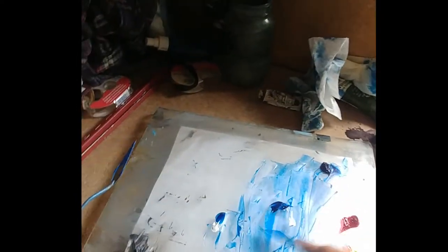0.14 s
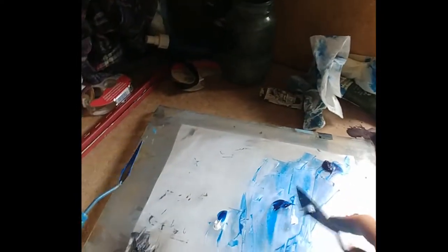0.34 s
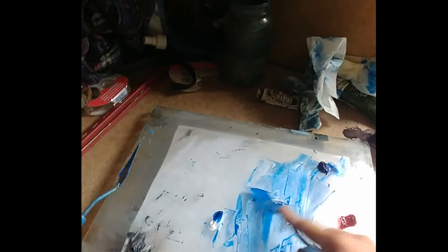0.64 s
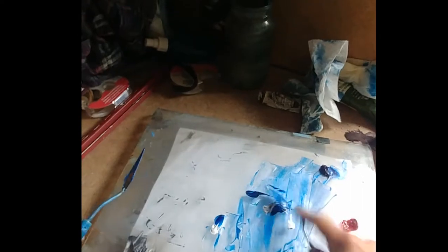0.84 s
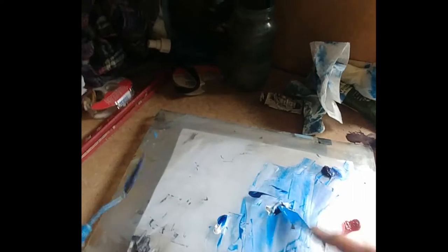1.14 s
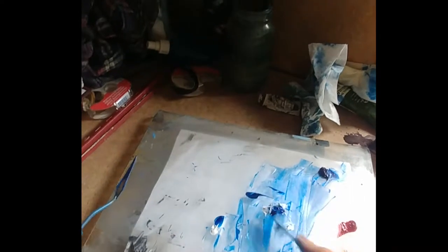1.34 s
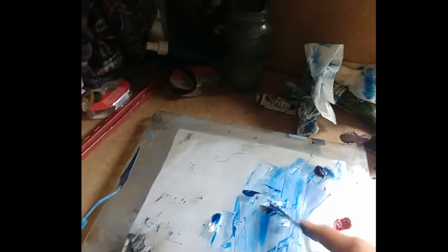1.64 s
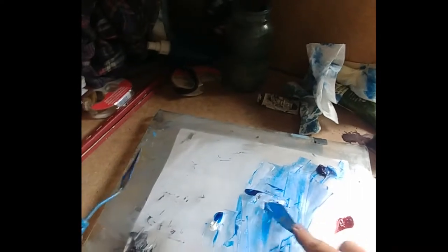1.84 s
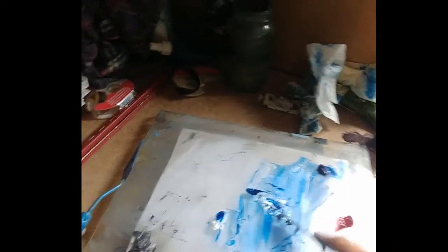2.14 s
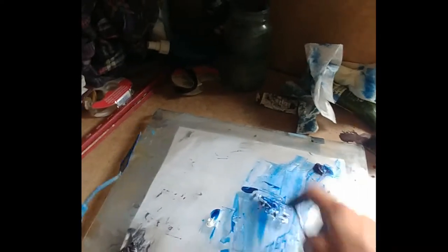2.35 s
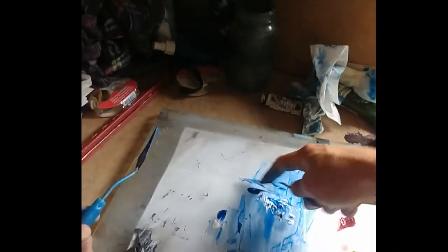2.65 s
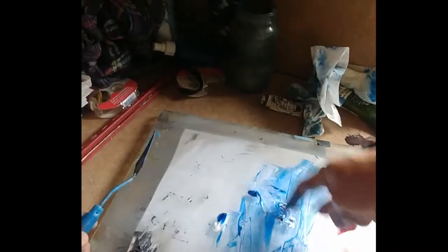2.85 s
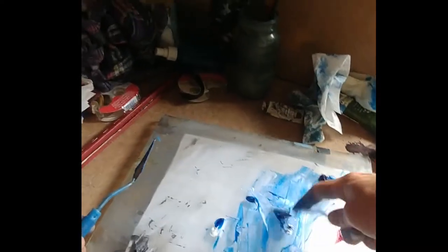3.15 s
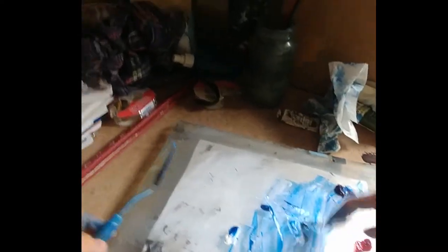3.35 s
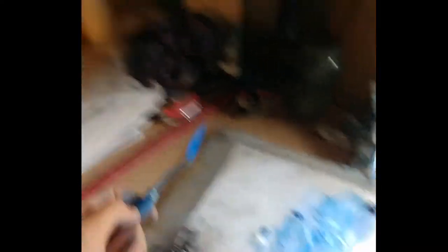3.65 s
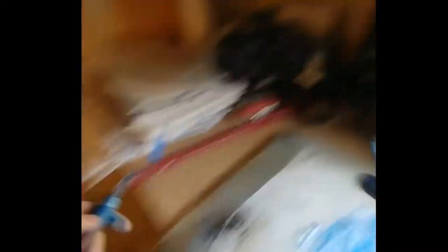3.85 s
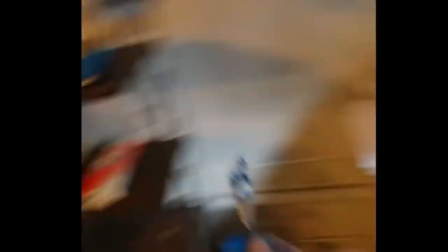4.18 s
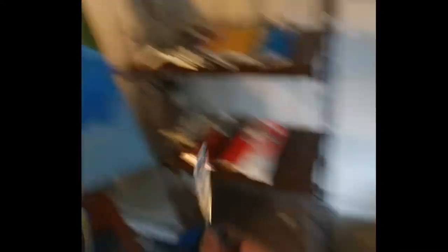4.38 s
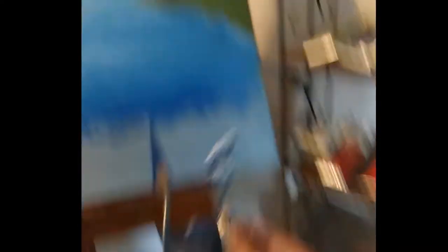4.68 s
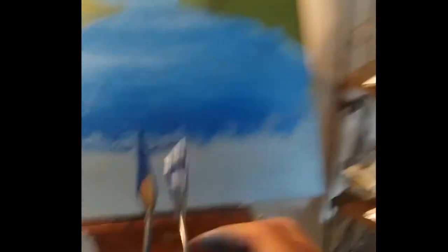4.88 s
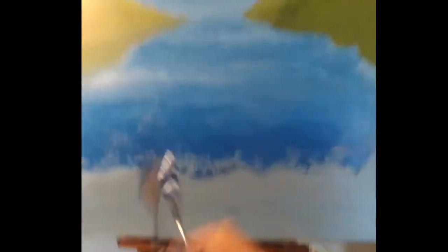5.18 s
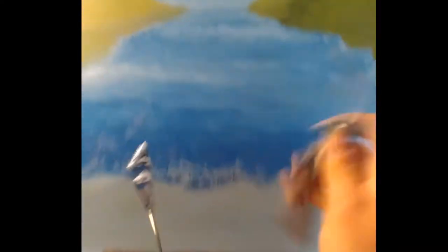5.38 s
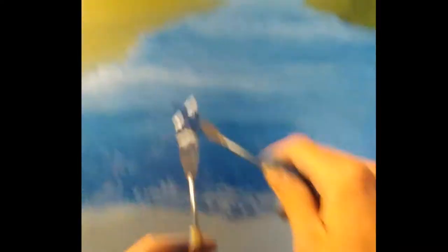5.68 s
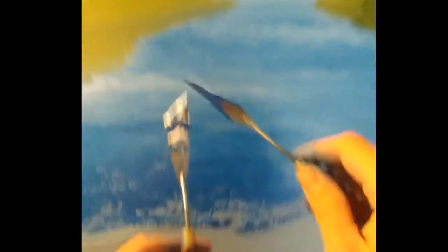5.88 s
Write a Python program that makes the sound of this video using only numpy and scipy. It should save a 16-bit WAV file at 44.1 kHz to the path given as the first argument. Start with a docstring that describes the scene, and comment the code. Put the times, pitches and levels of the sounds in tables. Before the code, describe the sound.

Scattered woody clacks with short metallic ring and faint wet paint sizzle, mixed with short scrapes and a brief squeak. After a strong double knock come duller finger thuds and groaning rubs on the board. Low lumpy handling noise and a cluster of bass thumps follow, with sleeve rustle, then quiet brushing on canvas. Dry little room, handheld stereo microphone, brighter to the left, faint hiss.

```python
"""A palette knife knocks and scrapes paint on a board lying on a wooden table; then a finger dabs and rubs it.
Blows are short noise plus ringing modes; strokes are coloured noise that swells and fades, over a stick-slip drone.
A hand-held recorder is swung round, bumping and rumbling, and the knife starts to spread paint on stretched canvas.
Around it lies a small, quiet room, heard through two microphone ports that face different ways."""
import sys
import numpy as np
from scipy import signal
from scipy.fft import rfft, irfft, next_fast_len
from scipy.io import wavfile

SR = 44100
rng = np.random.default_rng(int(sys.argv[2]) if len(sys.argv) > 2 else 0)


def materialize(psi):
    """Save the field psi as 16-bit PCM at rate SR to the path in sys.argv[1].

    A 1-D psi becomes a single channel; in a 2-D psi each row is a channel.
    """
    bounded = np.clip(np.atleast_2d(psi).T, -1, 1)
    quanta = np.round(bounded * 32767).astype(np.int16)
    wavfile.write(sys.argv[1], SR, quanta)


N = 265482
BLOW = SR // 3   # samples given to one blow
ONSET = SR // 30   # samples over which a blow's level is set
ROOM_T60_S = 0.3


def from_db(db):
    """Decibels to gain."""
    return 10 ** (np.asarray(db) / 20)


def rms_one(x, size=None):
    """Scale so that the first size samples have rms 1."""
    return x / np.sqrt(np.mean(x[..., :size] ** 2) + 1e-20)


def on_bins(points, size):
    """Read a table over frequency at the bins of a transform."""
    hz, value = np.transpose(points)
    return np.interp(np.log(np.fft.rfftfreq(size, 1 / SR) + 1), np.log(hz), value)


def noise(colour, size, low=20, high=SR / 2):
    """Two unrelated noises with the given spectrum and band, together at rms 1."""
    padded = next_fast_len(size, True)
    hz = np.fft.rfftfreq(padded, 1 / SR) + 1
    band = 1 / np.sqrt((1 + (low / hz) ** 12) * (1 + (hz / high) ** 12))
    spectrum = rfft(rng.standard_normal((2, padded))) * band * from_db(on_bins(colour, padded))
    return rms_one(irfft(spectrum, padded)[:, :size])


def with_bands(colour, bands):
    """Lay bell-shaped humps and hollows over a spectrum."""
    hz = np.geomspace(30, SR / 2, 600)
    points_hz, points_db = np.transpose(colour)
    bells = sum(db * np.exp(-((hz - centre) / width) ** 2) for centre, width, db in bands)
    return np.column_stack([hz, np.interp(np.log(hz), np.log(points_hz), points_db) + bells])


def flutter(rate, depth_db):
    """A gain that wanders at random, with a new target rate times a second."""
    targets = rng.standard_normal(N // 8)
    wander = np.interp(np.arange(N) * rate / SR, np.arange(len(targets)), targets)
    return rms_one(from_db(depth_db * wander))


def strokes(rows):
    """One gain per level column: every stroke swells and fades, and overlapping strokes add in power."""
    t, power = np.arange(N) / SR, 0
    for s, swell_s, fade_s, *levels_db in rows:
        # 0 at the peak, 1 where the stroke is 20 dB down; the exponent shapes it: 1 = pointed, 2 = bell
        away = np.clip(np.maximum((s - t) / swell_s, (t - s) / fade_s), 0, 10)
        power = power + np.outer(from_db(levels_db), from_db(-20 * away ** 1.43)) ** 2
    return np.sqrt(power)


def favour(modes, near_hz, width_hz, lift_db):
    """The place of a blow brings out the modes near one pitch."""
    return [(hz, db + lift_db * np.exp(-((hz - near_hz) / width_hz) ** 2), t60) for hz, db, t60 in modes]


def dying(t60):
    """A gain over one blow that falls by 60 dB in t60 seconds."""
    return from_db(-60 * np.arange(BLOW) / SR / t60)


def ring(modes):
    """Struck modes of varying strength and random phase, with a soft attack; a pair in quadrature."""
    t = np.arange(BLOW) / SR
    hz, db, t60 = np.transpose(modes)[:, :, None]
    strength = from_db(db + 2 * rng.standard_normal(hz.shape) - 60 * t / t60)
    turns = hz * t + rng.random(hz.shape)
    wave = np.sum(strength * np.exp(2j * np.pi * turns), axis=0)
    wave = wave * (1 - np.exp(-t / .0007))
    return rms_one(np.array([wave.real, wave.imag]), size=ONSET)


def blow(zones, levels_db, colour, modes, crack_db):
    """One contact: per zone a first crack, a few clear modes and a noisy crowd of others with a room tail."""
    t, out = np.arange(BLOW) / SR, 0
    impulse = (t == 0) + 1e-18
    for (low, high, gain_db, rise, t60, tail_db, share), level_db in zip(zones, levels_db):
        decay = np.hypot(from_db(-60 * t / t60), from_db(tail_db - 60 * t / ROOM_T60_S))
        wave = rms_one(noise(colour, BLOW, low, high) * decay, size=ONSET)
        inside = [mode for mode in modes if low < mode[0] < high]
        if inside:
            wave = np.sqrt(1 - share) * wave + np.sqrt(share) * ring(inside)
        body = rms_one(wave * (1 - np.exp(-t / rise)), size=ONSET)
        crack_band = signal.butter(3, [low, np.sqrt(low * high)], "band", fs=SR, output="sos")
        crack = rms_one(signal.sosfilt(crack_band, impulse), size=ONSET)
        crack_pair = crack * [[1], [0]]   # only in the first of the two signals
        out = out + from_db(level_db + gain_db) * (body + from_db(crack_db) * crack_pair)
    return out


def cushioned(wave, zone_db, contact_s):
    """Skin gives way: the lighter the touch, the slower its attack."""
    rise = contact_s * from_db(-max(zone_db) - 26.5)   # contact_s holds when the loudest zone is at -26.5 dB
    return wave * (1 - np.exp(-np.arange(BLOW) / SR / rise))


def add(track, s, wave):
    """Mix a wave into the track at a time in seconds."""
    start = max(round(s * SR), 0)
    track[:, start:start + wave.shape[1]] += wave[:, :N - start]


# quiet room's spectrum: (frequency [Hz], relative density [dB])
ROOM_SPECTRUM = [(18, -28.5), (30, -13.5), (70, -1.5), (666, -9), (3060, -18.5), (3490, -16.5),
                 (3870, -17.5), (4530, -18), (8740, -27), (12600, -31.5), (16000, -19.5)]


def room_tone():
    """The quiet room is a steady coloured noise."""
    return from_db(-68) * noise(ROOM_SPECTRUM, N)


# knife on the board, levels before zone gain and blade lift: (time [s], thud [dB], board [dB], clack [dB],
# tick [dB], favoured board pitch [Hz], favoured blade pitch [Hz], blade ring [dB])
KNIFE_HITS = [(0.011, -62, -49, -54, -53.5, 468, 2850, -60.5),
              (0.5985, -38.5, -38, -29.5, -35.5, 420, 1798, -34),
              (0.708, -57.5, -51.5, -71, -78, 514, 2060, -63),
              (1.142, -48, -39.5, -51.5, -68, 710, 2690, -63),
              (1.2836, -35, -30, -25, -32.5, 505, 2080, -38.5), (1.475, -50, -48, -68, -86, 530, 2700, -80),
              (1.608, -51, -42, -61, -65, 499, 2380, -77),
              (1.684, -40, -36.5, -29.5, -51.5, 466, 2530, -39.5),
              (1.863, -53, -40, -59, -74, 517, 1960, -70), (1.923, -51, -53, -64.5, -76.5, 514, 2690, -73),
              (2.141, -49, -57, -47.5, -65.5, 495, 2940, -61.5),
              (2.1867, -31.5, -25.5, -30, -47, 473, 2595, -47),
              (2.1973, -28.5, -16.5, -18, -32.5, 393, 2440, -32)]
# zones of a knife blow: (low [Hz], high [Hz], gain [dB], rise time constant [s], noise t60 [s],
# room tail [dB], power share of clear modes [0-1])
KNIFE_ZONES = [(49.7, 620, -1, 0.007, 0.3, -17, .6), (328, 680, -2.5, 0.00057, 0.16, -13.5, 0.85),
               (680, 5000, -3, 0.0027, 0.085, -8, 0.18), (3570, 9350, -5.5, 0.0011, .1, -0.5, 0)]
# board on the table: (frequency [Hz], mean strength [dB], t60 [s])
TABLED_BOARD = [(78.7, -9.5, 0.39), (138, -1, 0.2), (161.4, 5.5, 0.15), (247.7, -1, 0.27), (394, -5.5, 0.1),
                (468, -5.5, 0.12), (514, -2.5, 0.11), (710, 2, 0.11), (803, -3.5, 0.085), (892, -10, 0.11),
                (1062, -8.5, 0.27), (1163, -5.5, 0.1), (1375, -3.5, .22), (1515, -7.5, 0.28)]
# steel blade before the hand and paint damp it: (frequency [Hz], mean strength [dB], t60 [s])
STEEL_BLADE = [(1770, -5, 0.061), (2060, -4.5, .15), (2102, 0, 0.14), (2600, -5.5, 0.035),
               (2500, -30, 0.099), (2690, -10.5, 0.46), (2850, 6.5, 0.039), (3200, -4.5, 0.071),
               (3186, -5.5, 0.15), (4600, -19.5, 0.15), (5000, -14, .12), (7060, -27.5, 0.31)]
# knife's clack: (frequency [Hz], relative density [dB]), then its humps: (centre [Hz], width [Hz], height [dB])
CLACK_SPECTRUM = [(50, -21), (100, -2.5), (160, -2.5), (320, -3), (480, 0.5), (610, -3.5), (850, 3.5),
                  (1300, -1), (3100, -3), (3800, -14), (5000, -17.5), (5900, -20), (7400, -14.5),
                  (9000, -23), (10500, -49), (14000, -32.5)]
CLACK_HUMPS = [(576, 45, -7.5), (900, 69, -0.5), (2108, 120, 1), (2440, 210, -2.5), (3070, 110, 4),
               (3880, 170, -3.5), (4920, 230, 5.5), (5800, 330, -2.5), (7250, 300, 2)]
# wet paint, spitting or sizzling: (frequency [Hz], relative density [dB])
PAINT_SPECTRUM = [(5000, -13), (8000, -5), (10500, -6.5), (12000, -8), (13200, -1), (14500, -5),
                  (16000, -3.5)]


def knife_knocks():
    """The knife clacks on the board, its hand- and paint-damped blade rings and wet paint spits at every blow."""
    out, clack_colour = np.zeros((2, N)), with_bands(CLACK_SPECTRUM, CLACK_HUMPS)
    blade_lift_db, blade_damping_t60_s = 4, 0.46
    spit_below_tick_db, spit_t60_s = -23, 0.2
    for s, *zone_db, board_hz, blade_hz, blade_db in KNIFE_HITS:
        board = favour(TABLED_BOARD, board_hz, width_hz=30, lift_db=7)
        blade = favour(STEEL_BLADE, blade_hz, width_hz=90, lift_db=11)
        add(out, s, blow(KNIFE_ZONES, zone_db, clack_colour, board, crack_db=-19))
        add(out, s, from_db(blade_db + blade_lift_db) * ring(blade) * dying(blade_damping_t60_s))
        spit = noise(PAINT_SPECTRUM, BLOW) * dying(spit_t60_s)
        add(out, s, from_db(zone_db[-1] + spit_below_tick_db) * spit)
    return out


# board under a resting finger: (frequency [Hz], mean strength [dB], t60 [s])
FINGERED_BOARD = [(74, -5, 0.18), (98, -3, 0.26), (142, -2.5, 0.21), (254.2, -7.5, 0.39), (394, -6, 0.14),
                  (477.5, -3.5, 0.1), (511.7, 0, 0.1), (678, -6.5, .12), (836, -5.5, 0.058),
                  (1134, -11.5, 0.16), (1360, -7, 0.28)]


def stick_slip(per_s, spread_db):
    """Uneven small slips, softened by the paint, keep the board ringing while the contact damps it."""
    sizes = from_db(spread_db * rng.standard_normal(N)) * rng.choice([-1, 1], N)
    slips = sizes * (rng.random(N) < per_s / SR)
    soft = signal.sosfilt(signal.butter(2, 750, fs=SR, output="sos"), slips + 1e-18)
    board = ring(favour(FINGERED_BOARD, 520, width_hz=140, lift_db=9)) * dying(0.25)
    return rms_one(signal.fftconvolve(soft[None], board)[:, :N])


# soft swish and rough scratch, on board and cloth alike: (frequency [Hz], relative density [dB])
SWISH_SPECTRUM = [(600, -10.5), (1200, -8.5), (1700, -10.5), (2150, -0.5), (2450, -6.5), (2850, -1),
                  (3600, -15), (5000, -28), (9000, -41.5)]
SCRATCH_SPECTRUM = [(1000, -12), (3000, 4), (4700, 3.5), (5800, 0.5), (7500, 3.5), (9000, -9),
                    (11000, -21.5), (13500, -14.5), (16000, -15.5)]


def grainy(swish, scratch, sizzle=0):
    """Sliding contact catches on the grain: swish, scratch and sizzle flicker, the scratch most of all."""
    rough = from_db(2) * scratch * flutter(rate=61, depth_db=1.5)
    return flutter(rate=510, depth_db=1) * (from_db(-2) * swish + rough + from_db(4) * sizzle)


# knife or finger sliding on the board, levels before the mix trims: (fastest moment [s], 20 dB swell [s],
# 20 dB fade [s], drone [dB], swish [dB], scratch [dB], sizzle [dB])
BOARD_SLIDES = [(0.015, 0.12, 0.046, -48.5, -50, -63, -83), (0.15, 0.077, 0.051, -63, -70, -64.5, -88),
                (0.776, 0.035, 0.055, -60, -59.5, -68, -88), (0.89, 0.16, 0.12, -53.5, -59, -70.5, -87),
                (1.352, 0.045, 0.07, -68, -54, -44, -47), (1.654, 0.031, 0.074, -60, -55.5, -55.5, -67),
                (1.81, .1, .07, -68.5, -60, -87, -90), (1.98, 0.14, 0.058, -57.5, -66.5, -79, -88),
                (2.57, 0.12, 0.24, -74, -55.5, -86, -83), (2.776, .22, 0.22, -48, -48, -70, -93),
                (2.965, .15, 0.074, -45.5, -48.5, -48, -60), (3.135, 0.013, 0.14, -41.5, -48.5, -55, -50.5),
                (3.27, .11, 0.1, -40.5, -50, -54, -77), (3.475, 0.074, .06, -40.5, -50.5, -48, -55),
                (3.66, 0.11, 0.15, -72, -54, -66.5, -90)]


def board_rubbing():
    """The sliding board contact drones by stick-slip, swishes and scratches, and the wet paint sizzles."""
    drone_gain, swish_gain, scratch_gain, sizzle_gain = strokes(BOARD_SLIDES)
    drone = from_db(0.5) * drone_gain * stick_slip(per_s=160, spread_db=4)
    swish = swish_gain * noise(SWISH_SPECTRUM, N)
    scratch = scratch_gain * noise(SCRATCH_SPECTRUM, N)
    sizzle = sizzle_gain * noise(PAINT_SPECTRUM, N)
    return drone + grainy(swish, scratch, sizzle)


# hand shifting on the case, before a 1 dB cut: (firmest moment [s], 20 dB swell [s], 20 dB fade [s], rumble [dB])
GRIP_MOVES = [(0.13, .2, 0.115, -58), (0.61, 0.023, .2, -49), (0.84, 0.12, 0.21, -45),
              (1.5, .06, .05, -60.5), (1.69, 0.099, 0.18, -50), (1.98, 0.37, 0.095, -49.5),
              (2.33, 0.24, .12, -54), (2.6, 0.066, 0.17, -51.5), (3.03, 0.22, 0.1, -46.5),
              (3.2, .1, 0.13, -41.5), (3.42, 0.13, 0.19, -46.5), (3.72, .12, .07, -55.5),
              (3.88, 0.047, 0.12, -41.5), (4.24, .15, 0.31, -48.5), (4.44, .12, 0.13, -46.5),
              (4.69, 0.1, 0.062, -45.5), (4.92, 0.14, .15, -50.5), (5.04, .1, 0.16, -50.5),
              (5.23, 0.09, 0.24, -58), (5.56, 0.175, .22, -53), (5.93, .3, .2, -58)]
# rumble and bumps of the case: (frequency [Hz], relative density [dB])
CASE_SPECTRUM = [(35, -19), (63, 7.5), (95, -5.5), (145, -3.5), (300, -17), (700, -17), (1400, -26),
                 (3000, -19), (8000, -28), (15000, -80)]


def grip_rumble():
    """Fingers shifting on the case make a lumpy low noise."""
    rumble = noise(CASE_SPECTRUM, N, low=45, high=500) * flutter(rate=25, depth_db=3.5)
    return from_db(-1) * strokes(GRIP_MOVES) * rumble


# blade squeaking over the board: (fastest moment [s], 20 dB swell [s], 20 dB fade [s], level [dB])
BLADE_SQUEAKS = [(0.925, 0.087, 0.14, -60.5)]
# squeak before its band limits: (frequency [Hz], relative density [dB])
SQUEAK_SPECTRUM = [(1900, -29), (2080, -9), (2125, -2.5), (2170, -12), (2400, -30)]


def blade_squeak():
    """The blade's squeak is a narrow band of noise that swells and fades."""
    return strokes(BLADE_SQUEAKS) * noise(SQUEAK_SPECTRUM, N, low=1400, high=1640)


# finger on the board, levels before zone gain: (time [s], thud [dB], board [dB], clack [dB], tick [dB],
# favoured board pitch [Hz])
FINGER_HITS = [(2.578, -44, -28.5, -41.5, -59.5, 516), (2.771, -51.5, -39.5, -59.5, -61.5, 487),
               (2.874, -48.5, -36.5, -50, -58.5, 542), (2.982, -39, -34, -58, -62.5, 499),
               (3.118, -33, -20.5, -28, -31, 490), (3.37, -36, -23, -31.5, -39, 473.5)]
# zones of a dab: (low [Hz], high [Hz], gain [dB], rise time constant [s], noise t60 [s],
# room tail [dB], power share of clear modes [0-1])
FINGER_ZONES = [(50, 730, 0.0024, 0.0056, 0.32, -8, 0.73), (328.3, 680, 0.0059, 0.0024, 0.035, -19.5, 0.81),
                (653.5, 6000, 0, 0.00064, 0.11, -6, 0.025), (3540, 9900, 0.0075, 0.0022, 0.082, -2.5, 0)]
# finger's contact noise: (frequency [Hz], relative density [dB])
FINGER_SPECTRUM = [(50, -7.5), (100, -9.5), (160, 3.5), (290, -9.5), (480, -1.5), (680, -17), (850, -2),
                   (1150, 2), (1700, -7), (2700, 1), (3900, -15.5), (6600, -17), (9000, -26.5),
                   (14000, -36.5)]


def finger_dabs():
    """A finger strikes the board it damps, its skin rounding off the attack."""
    out = np.zeros((2, N))
    for s, *zone_db, board_hz in FINGER_HITS:
        board = favour(FINGERED_BOARD, board_hz, width_hz=28, lift_db=7.5)
        dab = blow(FINGER_ZONES, zone_db, FINGER_SPECTRUM, board, crack_db=-24)
        add(out, s, cushioned(dab, zone_db, contact_s=.0006))
    return out


# bumps on the case, levels before zone gain: (time [s], thump [dB], knock [dB], click [dB])
CASE_HITS = [(3.861, -39.5, -55, -70), (4.065, -44.5, -58, -66), (4.461, -30.5, -49, -62),
             (4.505, -24.5, -29.5, -42.1), (4.554, -26, -39, -58), (4.568, -25, -43, -50.5),
             (4.612, -37, -73.5, -62.5), (4.657, -36.5, -52.5, -61.5), (4.914, -49, -63.5, -65.5),
             (4.998, -46, -63, -65), (5.034, -48.5, -71, -71.5), (5.546, -53.5, -67, -77)]
# zones of a bump: (low [Hz], high [Hz], gain [dB], rise time constant [s], noise t60 [s],
# room tail [dB], power share of clear modes [0-1])
CASE_ZONES = [(42.8, 390, -1.1, 0.0017, 0.098, -5.5, 0.8), (330, 1820, -0.99, 0.00029, 0.11, -16.5, 0),
              (2020, 9000, -1.5, 0.00059, 0.039, -13, 0)]
# recorder's case in the hand: (frequency [Hz], mean strength [dB], t60 [s])
HELD_CASE = [(61.3, -3, 0.3), (138.6, 2, .16), (223.2, -4, 0.12)]


def case_bumps():
    """Fingers bump the case: low modes and short noise, cushioned by skin."""
    out = np.zeros((2, N))
    for s, *zone_db in CASE_HITS:
        bump = blow(CASE_ZONES, zone_db, CASE_SPECTRUM, HELD_CASE, crack_db=-5.5)
        add(out, s, cushioned(bump, zone_db, contact_s=.00008))
    return out


# hand and sleeve moving, then knife on canvas, levels before the mix trims: (fastest moment [s],
# 20 dB swell [s], 20 dB fade [s], swish [dB], scratch [dB], hollow [dB])
CLOTH_SLIDES = [(3.92, 0.12, 0.17, -47.5, -57.5, -59), (4.1, 0.23, 0.19, -59.5, -78, -69),
                (4.335, 0.077, .09, -50.5, -57.5, -55.5), (4.475, .09, 0.075, -45, -57, -57),
                (4.57, 0.011, 0.041, -63, -51.5, -60), (4.71, 0.056, 0.18, -57.5, -69.5, -67),
                (4.895, .02, 0.041, -65, -68.5, -73), (5.042, 0.045, 0.091, -74, -77.5, -58.5),
                (5.22, 0.072, .25, -67, -86, -89), (5.45, 0.11, .08, -63, -75.5, -66.5),
                (5.536, 0.04, .03, -63, -83.5, -58.5), (5.64, .05, .25, -65.5, -69, -67.5),
                (5.86, 0.084, 0.11, -51.5, -60.5, -56), (5.97, 0.22, 0.18, -53, -55, -79)]
# humps and hollows of the rubbing cloth: (centre [Hz], width [Hz], height [dB])
CLOTH_HUMPS = [(1610, 110, 6.5), (2320, 85, -1.5), (4200, 490, 3), (5570, 440, -1.5), (7600, 200, 2.5)]
# hollow sound of the cloth: (frequency [Hz], relative density [dB])
HOLLOW_SPECTRUM = [(150, -10), (300, 0.5), (430, 0), (570, 4.5), (850, -1.5), (1200, -14), (1650, -17),
                   (2000, -29)]


def cloth_rubbing():
    """Sleeve and stretched canvas swish and scratch over a hollow band of noise."""
    swish_gain, scratch_gain, hollow_gain = strokes(CLOTH_SLIDES)
    swish = swish_gain * noise(with_bands(SWISH_SPECTRUM, CLOTH_HUMPS), N)
    scratch = scratch_gain * noise(with_bands(SCRATCH_SPECTRUM, CLOTH_HUMPS), N)
    hollow = hollow_gain * noise(HOLLOW_SPECTRUM, N, low=120, high=1900)
    return hollow + grainy(swish, scratch)


def ports(pair, likeness, balance):
    """Blend two unrelated signals into left and right with a likeness and balance per frequency."""
    size = next_fast_len(N + BLOW, True)
    a, b = rfft(pair, size)
    alike = np.clip(on_bins(likeness, size), -.99, .99)
    lean = from_db(on_bins(balance, size) / 2)
    left, right = a * lean, (alike * a + np.sqrt(1 - alike ** 2) * b) / lean
    return irfft([left, right], size)[:, :N]


# how alike the ports hear air and case (case bass arrives in opposite phase): (frequency [Hz], likeness [-1..1])
AIR_ALIKE = [(50, 1), (130, 0.85), (520, 0.83), (600, 0.51), (720, -0.24), (1300, -0.03), (2500, 0.024),
             (6000, -.05)]
CASE_ALIKE = [(70, -0.72), (140, 0.0051), (260, 0.16), (500, 0.79), (800, -0.6), (2500, 0.072)]
# how far air and case lean to the left: (frequency [Hz], left over right [dB])
AIR_LEAN = [(60, 5.5), (150, 3.5), (380, 3.5), (510, -1.5), (750, -0.5), (1300, 5), (2400, 13), (4400, 7),
            (8000, 12.5), (14000, 2)]
CASE_LEAN = [(70, 9), (140, 1.5), (270, -1), (500, 1.5), (1200, 10), (2400, 9.5), (6000, 4)]


def scene():
    """The work at the table comes through the air, the handling through the case."""
    air = room_tone() + knife_knocks() + board_rubbing() + blade_squeak() + finger_dabs() + cloth_rubbing()
    case = grip_rumble() + case_bumps()
    return ports(air, AIR_ALIKE, AIR_LEAN) + ports(case, CASE_ALIKE, CASE_LEAN)


def record(dry):
    """The deepest bass is filtered off, the ports swallow a treble band, electronics hiss and the top is cut."""
    lean = signal.sosfilt(signal.butter(4, 42, "high", fs=SR, output="sos"), dry)
    notch = signal.iirnotch(10500, 4.5, fs=SR)
    hiss = from_db(-77) * rng.standard_normal((2, N))
    wet = signal.lfilter(*notch, lean) + hiss
    return signal.sosfilt(signal.ellip(12, .1, 80, 15900, fs=SR, output="sos"), wet)


dry = scene()
out = record(dry)
materialize(out)
```